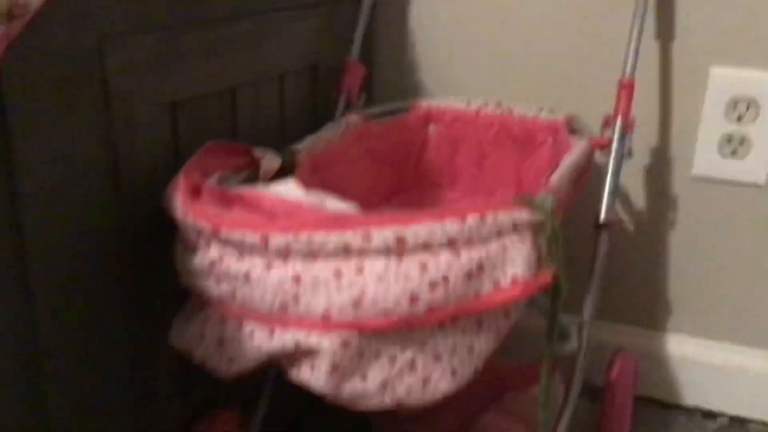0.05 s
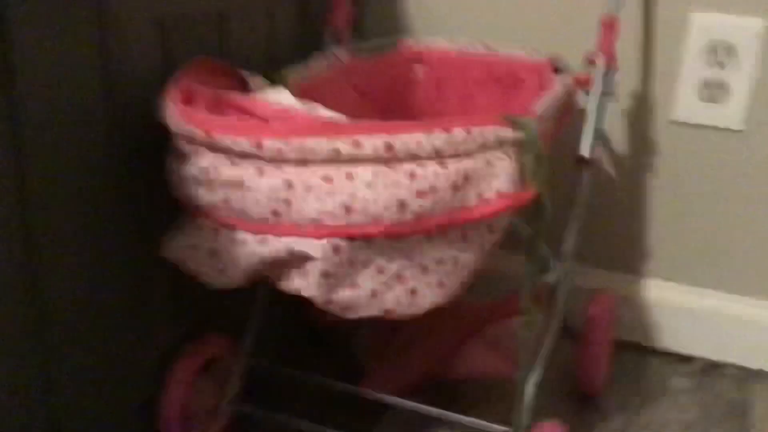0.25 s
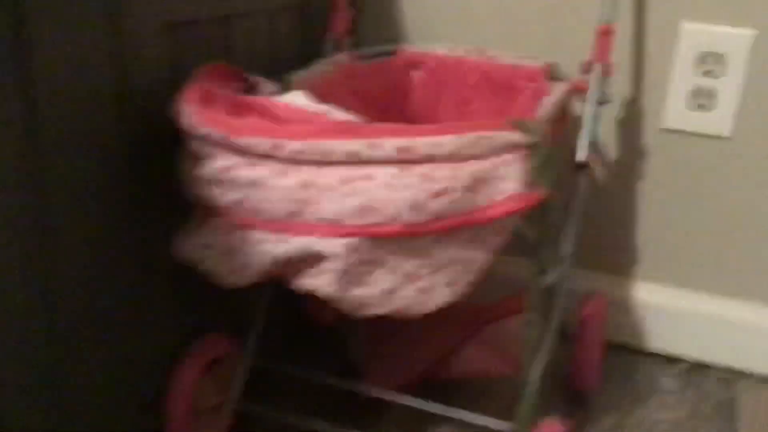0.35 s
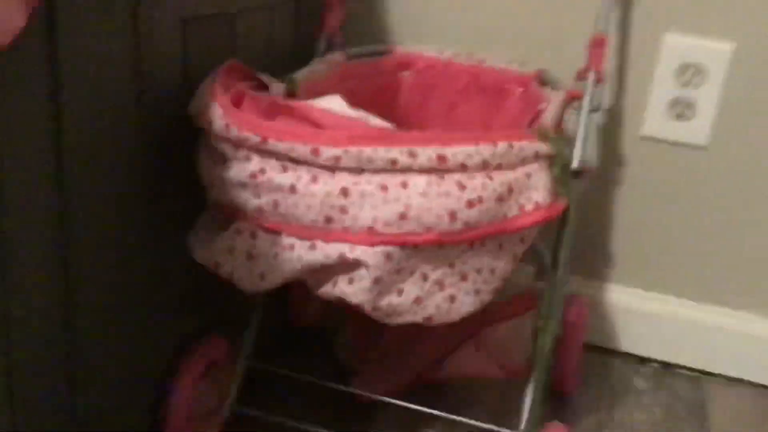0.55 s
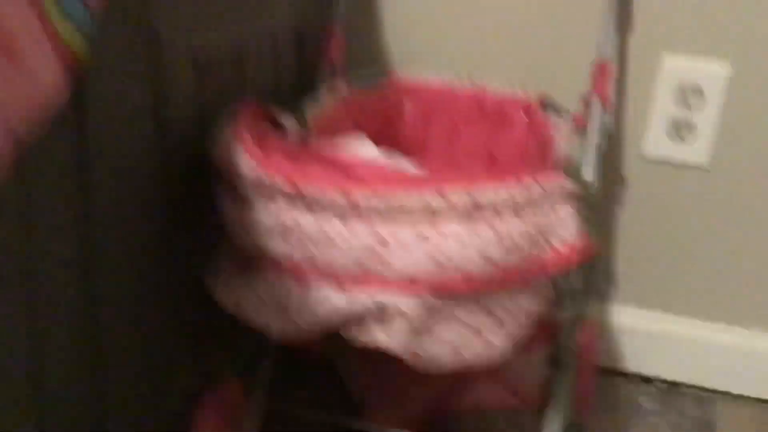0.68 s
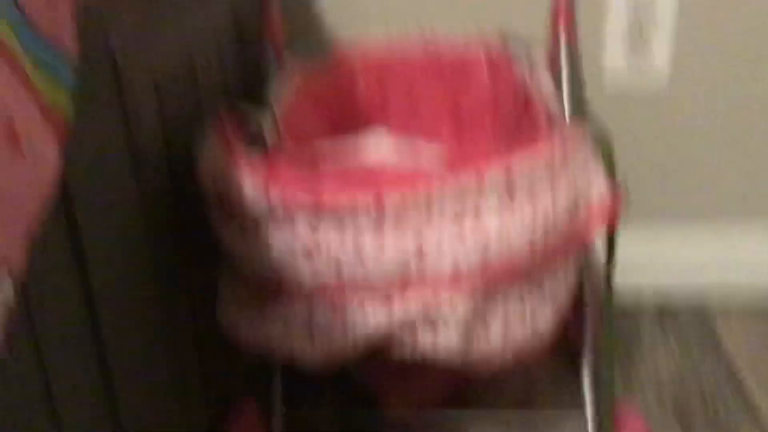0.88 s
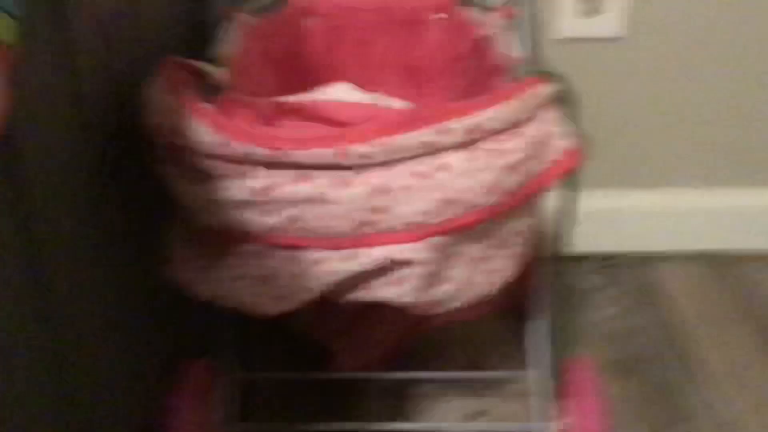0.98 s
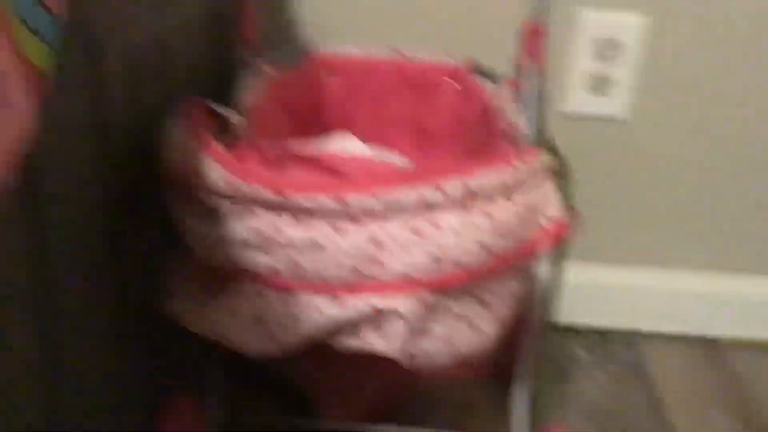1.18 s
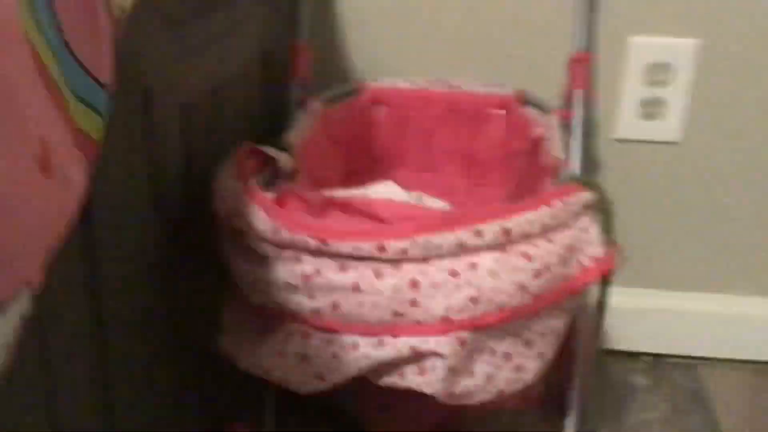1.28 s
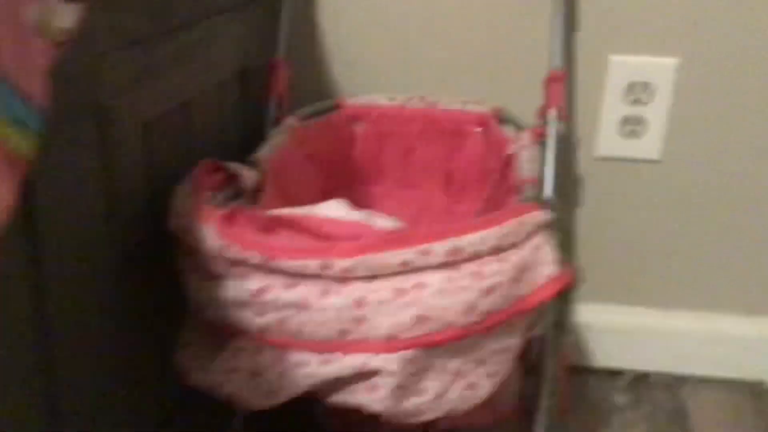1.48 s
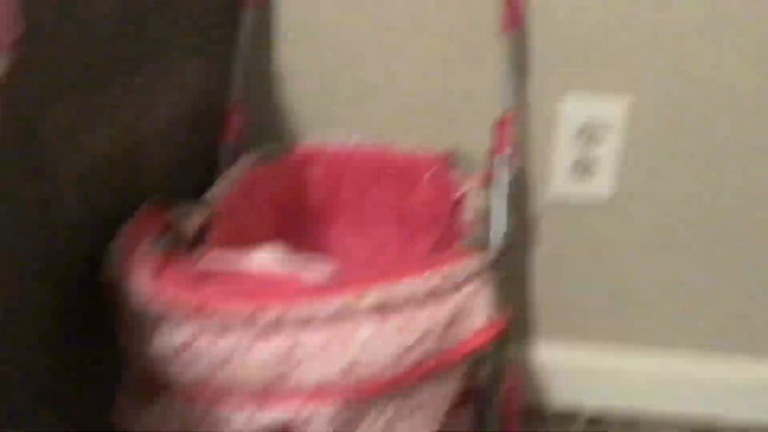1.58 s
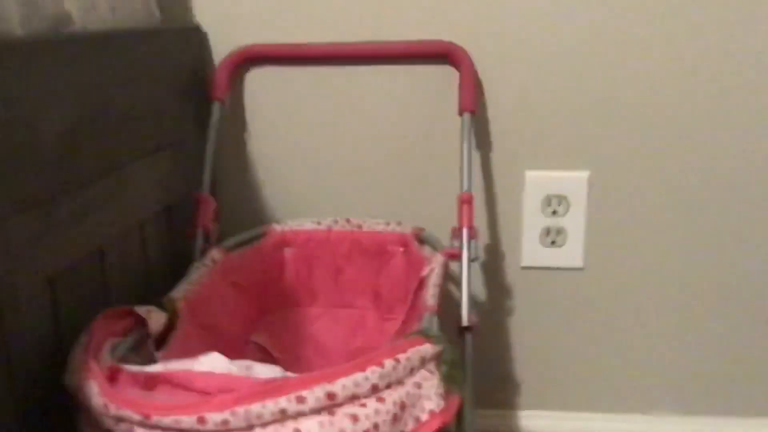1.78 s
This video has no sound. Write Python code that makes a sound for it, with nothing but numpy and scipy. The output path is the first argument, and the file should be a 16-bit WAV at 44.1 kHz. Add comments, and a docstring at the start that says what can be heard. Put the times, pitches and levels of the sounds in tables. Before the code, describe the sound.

A small toy stroller is handled indoors, bumping dully up close, then its fabric swishes with light knocks.

```python
"""Toy stroller in a quiet bedroom

A small toy stroller is moved and turned. Dull handling bumps (a ringing, damped body) sound close
to the microphone, with a few sharp ticks (very short bursts of noise). Then fabric swishes in several
strokes (coloured noise) while the frame gives some light knocks (short resonances).
Duller rubs, a low rumble and a faint hiss lie underneath."""
import sys
import numpy as np
from scipy import signal
from scipy.fft import rfft, irfft, next_fast_len
from scipy.io import wavfile

SR = 44100
rng = np.random.default_rng(int(sys.argv[2]) if len(sys.argv) > 2 else 0)


def generate_wav(sig):
    """Save sig (samples, or channels by samples) to the path in sys.argv[1] as 16-bit PCM at SR."""
    pcm = np.round(np.clip(np.atleast_2d(sig).T, -1, 1) * 32767).astype(np.int16)
    wavfile.write(sys.argv[1], SR, pcm)


N = 81585  # length of the scene in samples
TIME = np.arange(N) / SR  # seconds
SIZE = next_fast_len(2 * N)  # transform length, with room so that filtering does not wrap around
HZ = np.maximum(np.arange(SIZE // 2 + 1) * SR / SIZE, 1)


def from_db(db):
    """Turn decibels into a gain."""
    return 10 ** (np.asarray(db) / 20)


def rms_one(x):
    """Scale a signal to an average (rms) strength of 1."""
    return x / np.sqrt(np.mean(x ** 2) + 1e-20)


def level(rows):
    """Gain over time, gliding in dB between (time [s], level [dB]) rows."""
    return from_db(np.interp(TIME, *np.transpose(rows)))


def coloured(x, colour):
    """Shape a signal by (frequency [Hz], level [dB]) points, falling away below the first."""
    hz, db = np.transpose(colour)
    gain = from_db(np.interp(np.log(HZ), np.log(hz), db))
    gain = gain * np.minimum(HZ / hz[0], 1) ** 2
    return irfft(rfft(x, SIZE) * gain, SIZE)[:N]


def noise(colour):
    """Coloured random noise of rms 1."""
    return rms_one(coloured(rng.standard_normal(N), colour))


def low_pass(x, order, hz):
    """Dull a signal by taking away what lies above hz."""
    return signal.sosfilt(signal.butter(order, hz, fs=SR, output="sos"), x)


def high_pass(x, order, hz):
    """Thin a signal by taking away what lies below hz."""
    return signal.sosfilt(signal.butter(order, hz, "high", fs=SR, output="sos"), x)


def resonate(x, hz, q):
    """A broad resonance applied twice; a higher sharpness q rings longer."""
    b, a = signal.iirpeak(hz, q, fs=SR)
    once = signal.lfilter(b, a, x + 1e-18)  # the tiny offset avoids slow arithmetic near zero
    return signal.lfilter(b, a, once)


def dying(t60):
    """Exponential decay from 1, losing 60 dB in t60 seconds."""
    return np.exp(-np.log(1000) * np.minimum(TIME / t60, 10))


def add(out, s, x):
    """Mix x into out from time s in seconds."""
    start = max(int(s * SR), 0)
    out[start:start + len(x)] += x[:N - start]


def room_hiss():
    """The steady, faint hiss of the room: coloured noise."""
    # tone of the hiss: (frequency [Hz], level [dB])
    hiss_colour = [(200, 5.5), (900, 1.5), (1500, -9.5), (1740, 6.5), (2000, -4), (5000, -3.5),
                   (9000, -10.5), (12000, -14), (15500, -26)]
    return from_db(-80) * noise(hiss_colour)


def movement_rumble():
    """Low rumble of the movement: deep noise that rises and falls."""
    # strength of the rumble before its boost: (time [s], level [dB])
    rumble_level = [(0, -38), (.07, -60), (.1, -52), (.17, -72), (.22, -48), (.31, -63.5), (.37, -43.5),
                    (.44, -57), (.52, -65.5), (.73, -69), (.81, -65.5), (.86, -66.5), (.95, -66),
                    (1.1, -69), (1.2, -66), (1.27, -67), (1.4, -67), (1.6, -63.5), (1.85, -70)]
    # tone of the rumble: (frequency [Hz], level [dB])
    rumble_colour = [(28, -25), (50, 0.5), (80, 0.5), (130, 0.5), (200, -6.5), (350, -9.5), (600, -20.5),
                     (1200, -33), (3000, -53.5)]
    boost_db = 0.5
    return from_db(boost_db) * level(rumble_level) * noise(rumble_colour)


def bedroom(x):
    """The room's answer: a faint, short diffuse tail of decaying noise."""
    room_db, room_t60_s = -31.5, 0.25
    tail = rng.standard_normal(N) * dying(room_t60_s)
    tail = tail / np.sqrt(np.sum(tail ** 2))
    return from_db(room_db) * signal.fftconvolve(x, tail)[:N]


def rubs():
    """Short dull scuffs under the fabric: resonant noise that swells and fades."""
    # each rub: (time [s], length [s], level [dB], centre [Hz], sharpness Q)
    rub_rows = [(0.0, 0.014, -56.5, 704, 0.6), (0.414, 0.072, -58.5, 480, 0.92),
                (0.719, 0.028, -64.5, 844, .8), (0.846, 0.18, -67.5, 515, 4.6),
                (1.062, 0.23, -66.5, 612, 1.03), (1.292, .12, -60, 890, 1.16)]
    out = np.zeros(N)
    for s, length, db, hz, q in rub_rows:
        swell = np.sqrt(np.abs(np.sin(np.pi * np.minimum(TIME / length, 1))))
        scuff = rms_one(resonate(rng.standard_normal(N), hz, q))
        add(out, s, from_db(db) * swell * scuff)
    return out


def reflected(x):
    """Direct sound plus early echoes off wall, floor and furniture, which comb it finely."""
    echo_count, echo_db, echo_span_s = 24, -13.5, 0.03
    lags = rng.uniform(0.1, 1, echo_count) * echo_span_s
    sizes = from_db(echo_db) * rng.standard_normal(echo_count) / np.sqrt(echo_count)
    out = x.copy()
    for lag, size in zip(lags, sizes):
        add(out, lag, size * x)
    return out


def sliding(rows):
    """Cloth sliding on a level curve: smooth friction hiss plus fibres that catch and let go."""
    # tone of the swish: (frequency [Hz], level [dB])
    swish_colour = [(290, -30.5), (500, -5), (530, -2), (577, -4), (781, -2.5), (851, -9.5), (1100, -2.5),
                    (1850, -6), (2430, -2), (3150, -4.5), (4710, -4.5), (7790, -5), (8740, -1.5),
                    (11700, -11), (15500, -13.5)]
    fibres_per_s, fibre_spread_db, fibre_db = 4500, 3.5, -6
    flutter_db = 0.84  # rms size of the level wobble
    caught = rng.random(N) < fibres_per_s / SR
    strength = from_db(fibre_spread_db * np.minimum(rng.exponential(1, N), 5))
    fibres = caught * rng.choice([-1, 1], N) * strength
    friction = rng.standard_normal(N) + from_db(fibre_db) * rms_one(fibres)
    cloth = rms_one(coloured(reflected(friction), swish_colour))
    wobble = noise([(10, 2), (60, -4.5), (300, -43.5), (2000, -90)])  # mostly slow
    return level(rows) * from_db(flutter_db * wobble) * cloth


def fabric():
    """Sliding cloth: duller brushing between the bumps, then the long bright strokes."""
    # brushing, before it is dulled: (time [s], level [dB])
    brush_level = [(0, -55.5), (.02, -55.5), (.034, -66.5), (.055, -70), (.08, -82.5), (.3, -86),
                   (.33, -78), (.353, -62), (.40, -69), (.43, -70), (.5, -100)]
    # fabric sliding in several strokes, before its boost: (time [s], level [dB])
    swish_level = [(0.41, -78), (0.454, -59), (0.49, -72.5), (0.682, -63), (0.786, -63), (0.862, -72.5),
                   (0.894, -67), (1.002, -63), (1.098, -68), (1.192, -59.5), (1.228, -64.5), (1.308, -55),
                   (1.572, -67), (1.592, -73.5), (1.85, -78.5)]
    brush_cut_hz, swish_boost_db, swish_attack_s = 9000, 1.5, 0.023
    brushing = low_pass(sliding(brush_level), 2, brush_cut_hz)
    # silent at first, then fading in to reach full strength at the first row
    attack = np.clip(1 + (TIME - swish_level[0][0]) / swish_attack_s, 0, 1)
    return brushing + from_db(swish_boost_db) * attack * sliding(swish_level)


def knocks():
    """Light knocks of the frame: a few cycles of a damped resonance, then a faint rattling tail."""
    # each knock: (time [s], level [dB], pitch [Hz], sharpness Q)
    knock_rows = [(0.041, -48, 1050, 2.1), (0.204, -51.5, 553, 1.7), (0.4058, -36, 490, 1.7),
                  (0.727, -54.5, 870, 2.3), (1.124, -47.5, 1120, 2.1), (1.127, -45.5, 1140, 3.2),
                  (1.1656, -46, 1100, 2.2), (1.3484, -35.5, 960, 1.12), (1.3534, -39.5, 704, 2.36)]
    tail_db, tail_t60_s = -24, 0.13
    out = np.zeros(N)
    for s, db, hz, q in knock_rows:
        blow = resonate(signal.unit_impulse(N), hz, q)
        blow = blow / np.abs(blow).max()
        tail = rms_one(resonate(rng.standard_normal(N), hz, q / 2)) * dying(tail_t60_s)
        add(out, s, from_db(db) * (blow + from_db(tail_db) * tail))
    return out


def ticks():
    """Tiny bright cracks of hard parts touching, each with a duller after-rattle."""
    # each tick: (time [s], level before dulling [dB], brightness, its low-pass cutoff [Hz])
    tick_rows = [(0.0411, -41.5, 14600), (0.0976, -59.5, 5000), (0.205, -59, 3060), (0.2344, -37.5, 7500),
                 (0.2597, -41, 2000), (0.383, -46, 4130), (0.4049, -47, 3000), (1.127, -48, 1500),
                 (1.35, -39.5, 9100), (1.353, -51, 5000)]
    # tone of the ticks: (frequency [Hz], level [dB])
    tick_colour = [(700, -5.5), (1300, 8.5), (1600, -1.5), (1800, 5.5), (2120, 0), (2380, 7), (3300, -2.5),
                   (4200, -8), (6500, -16), (8500, -3), (11000, -16.5), (15500, -6.5)]
    crack_t60_s = 0.0062
    rattle_db, rattle_t60_s, rattle_cut_hz = -15, 0.036, 6020
    out = np.zeros(N)
    for s, db, bright_hz in tick_rows:
        rattle = low_pass(noise(tick_colour), 2, rattle_cut_hz) * dying(rattle_t60_s)
        crack = noise(tick_colour) * dying(crack_t60_s)
        tick = low_pass(crack + from_db(rattle_db) * rattle, 1, bright_hz)
        add(out, s, from_db(db) * tick)
    return out


def body_ring():
    """The damped body's ring: fading tones whose bass lags, so that it sweeps downwards."""
    # what a bump rings with: (frequency [Hz], level [dB], time to fade by 60 dB [s])
    body_modes = [(59, -14, 0.14), (103.3, -4, 0.06), (208, 2, 0.027), (319.2, 0, 0.023), (533, -11, 0.036),
                  (687, -8, 0.018), (929, -7.5, 0.015), (1270, -7, 0.013)]
    lag_cycles = 0.2446  # each frequency arrives this many of its own cycles late
    ring = np.zeros(N)
    for k, (hz, db, t60) in enumerate(body_modes):
        sign = (-1) ** k  # neighbours ring in opposite sign
        ring += sign * from_db(db) * dying(t60) * np.cos(2 * np.pi * hz * TIME)
    lag = np.exp(-2j * np.pi * lag_cycles * np.log(HZ / SR))
    ring = irfft(rfft(ring, SIZE) * lag, SIZE)[:SR // 2]  # keep half a second
    return low_pass(ring, 6, 1650)


def bumps():
    """Dull handling bumps: soft contacts ring the body, and softer ones sound duller."""
    # each bump: (time [s], peak level [dB], brightness of the contact [Hz], low cut [Hz])
    bump_rows = [(-0.003, -35.5, 290, 71), (0.005, -36.5, 169, 58), (0.024, -43.5, 220, 71),
                 (0.047, -35, 280, 56.3), (0.099, -64, 450, 100), (0.123, -42.5, 230, 54.6),
                 (0.2248, -29.5, 297, 100), (0.235, -10, 766, 135), (0.264, -43.5, 285, 68.7),
                 (0.3338, -43.5, 900, 173), (0.3380, -26.5, 530, 45), (0.347, -36.5, 168, 45.5),
                 (0.357, -35, 455, 70), (0.374, -41, 235, 56), (0.3814, -32.5, 187, 45),
                 (0.411, -54, 324, 100), (0.434, -56, 596, 80), (0.887, -50, 403, 122.5),
                 (1.124, -51, 284, 127), (1.175, -54.5, 120, 48.6)]
    ring = body_ring()
    out = np.zeros(N)
    for s, db, bright_hz, low_hz in bump_rows:
        bump = high_pass(low_pass(ring, 3, bright_hz), 2, low_hz)
        add(out, s, from_db(db) * bump / np.abs(bump).max())
    return out


def scene():
    """Hiss, rumble and cloth, with the contacts and their room tail, as one channel."""
    contacts = knocks() + ticks() + bumps()
    background = room_hiss() + movement_rumble() + bedroom(contacts)
    return (background + rubs() + fabric() + contacts)[None]


def record(dry):
    """The microphone loses the deepest bass; the top is cut steeply."""
    dry = high_pass(dry, 4, 36)
    return signal.sosfilt(signal.ellip(12, 0.1, 70, 15700, fs=SR, output="sos"), dry)


dry = scene()
out = record(dry)
generate_wav(out)
```